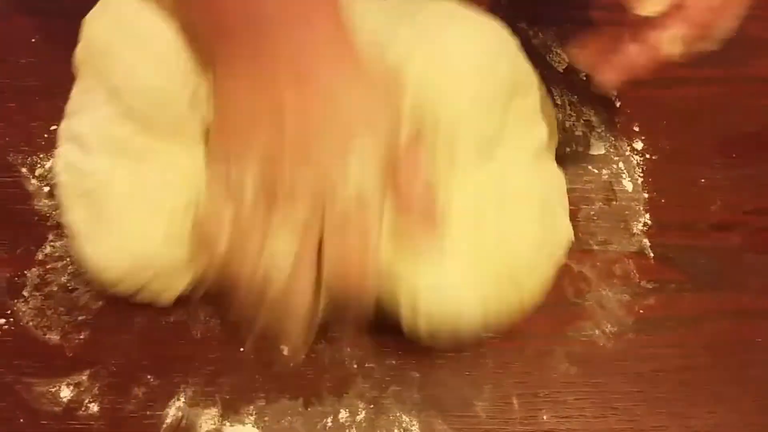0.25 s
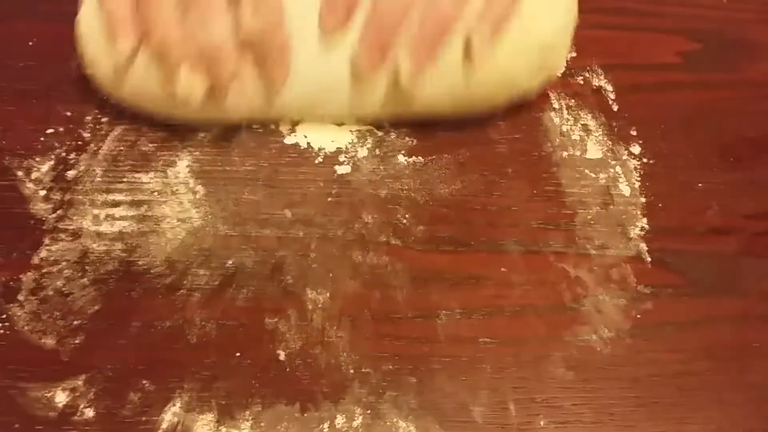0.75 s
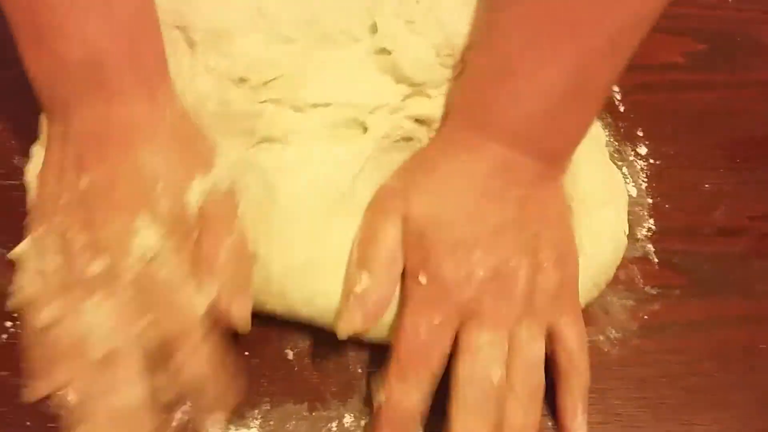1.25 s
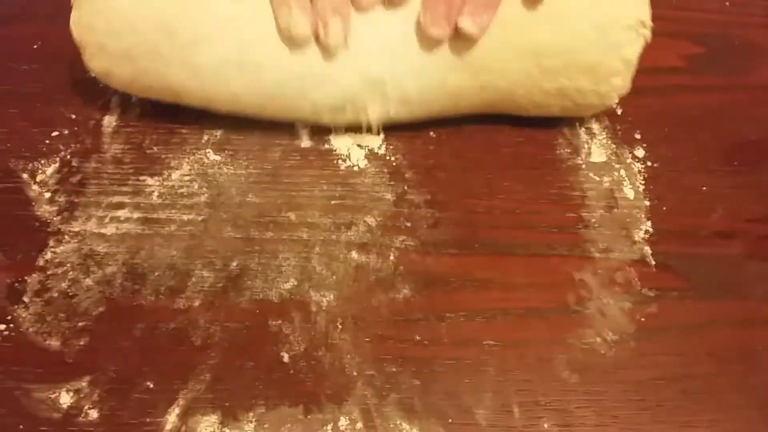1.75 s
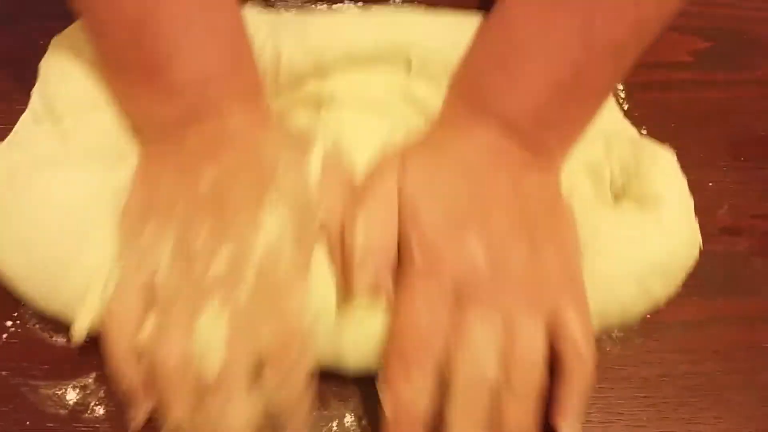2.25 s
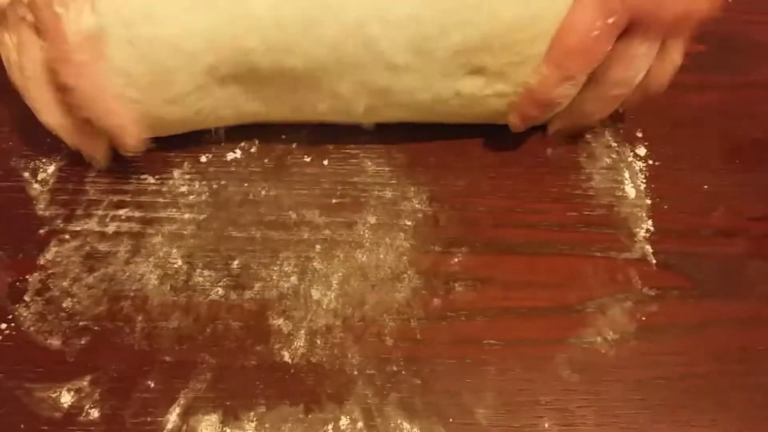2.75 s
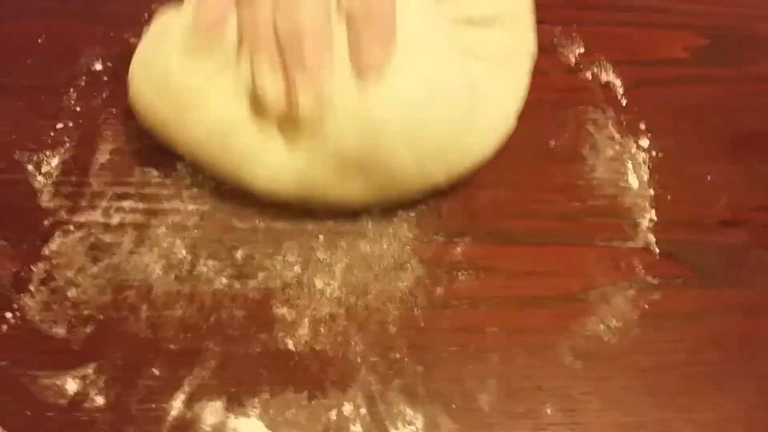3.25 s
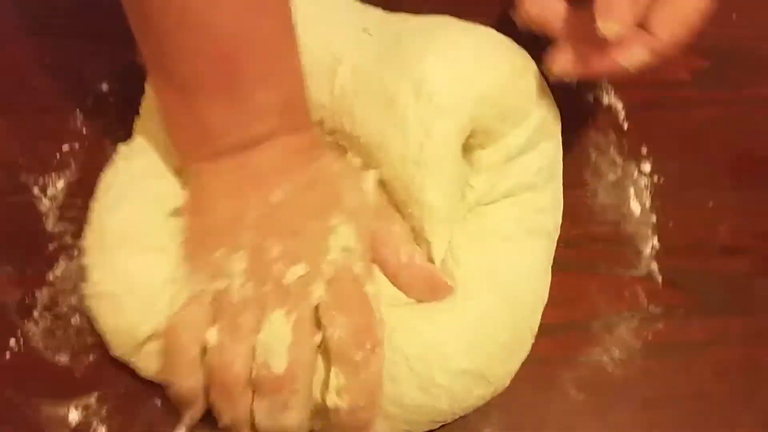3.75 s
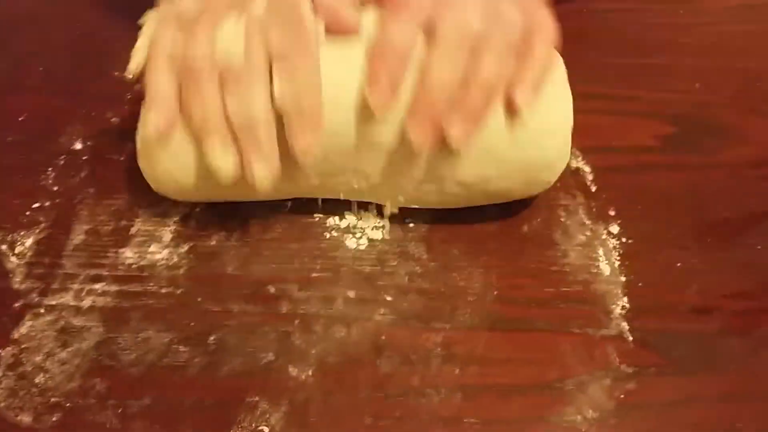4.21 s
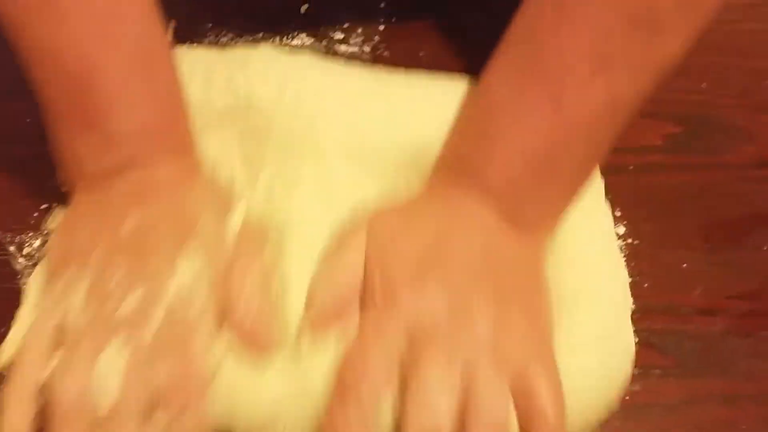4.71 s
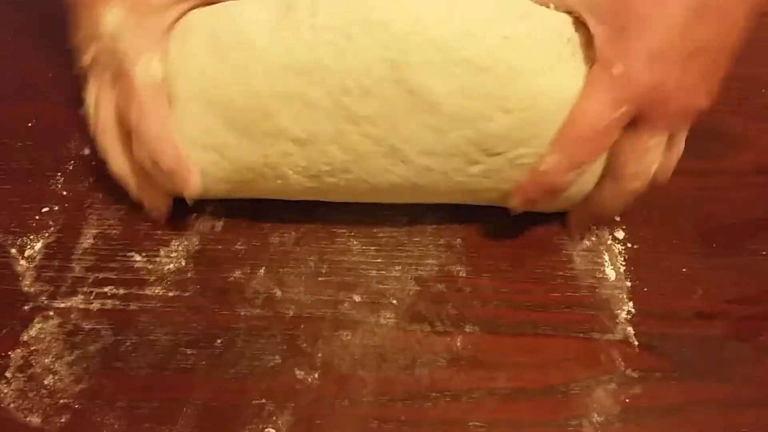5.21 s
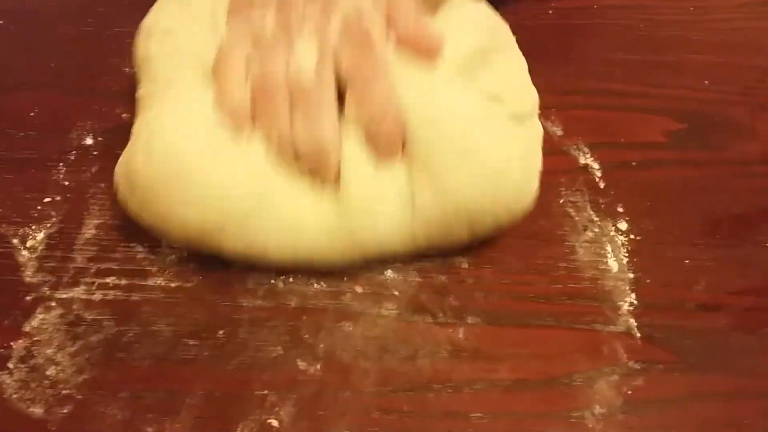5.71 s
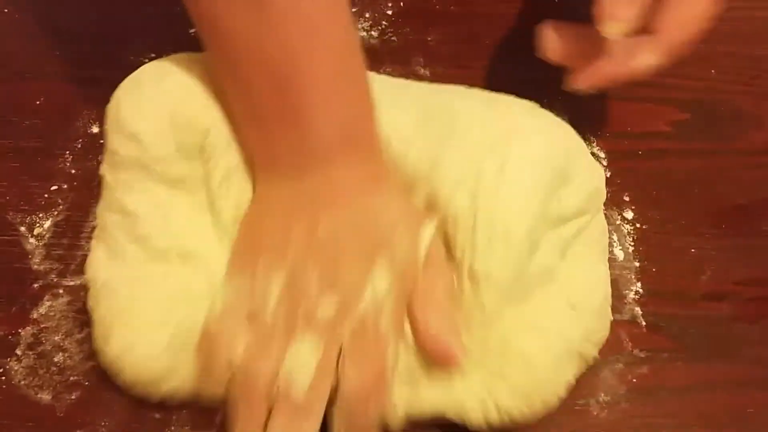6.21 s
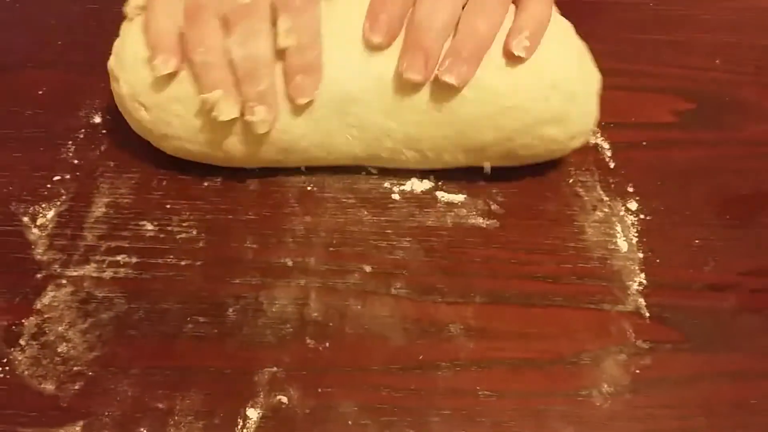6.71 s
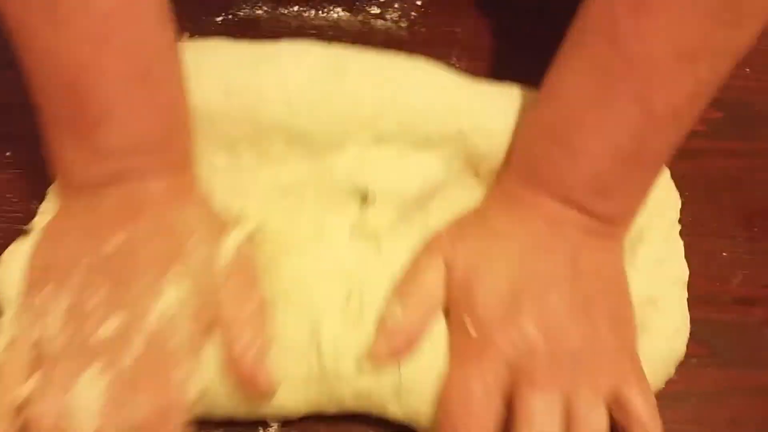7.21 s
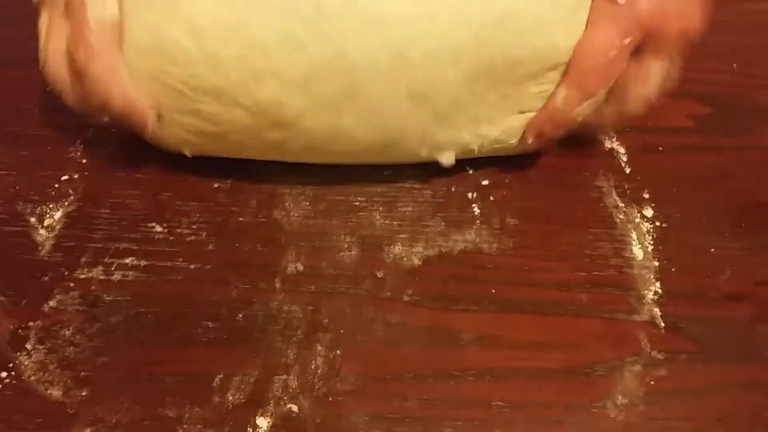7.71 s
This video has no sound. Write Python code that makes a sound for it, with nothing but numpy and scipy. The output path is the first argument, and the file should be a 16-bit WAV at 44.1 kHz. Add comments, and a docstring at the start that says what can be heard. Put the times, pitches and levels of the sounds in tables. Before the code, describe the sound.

Close by in a small, quiet kitchen, hands knead dough on a floured wooden table. It begins with soft pats and a rumbling push at 0.2 s, then a clearer smack at 0.67. Around 1.25 s a squelching shove ends in a short airy puff. Muted thuds and hollow pops follow, with a heavy thump at 2.65. Two hard slaps crack at 3.35 and 3.45, another at 4.28. A strong shove near 4.9 lets out air, a deep thud follows at 5.14, and bright slaps at 5.32 and 5.63, the latter loudest. Another push puffs at 6.22; slaps land at 6.72 and 6.81, with a barely audible high squeak around them. A last squelching press and puff come at 7.33, a low thump at 7.59 and a slap at 7.74. Faint flour rasp, tiny ticks, low room tone and hiss; the left side is louder, echoes short.

```python
"""Palms slap dough and the lump thumps a floured wooden table in a kitchen. Pushed, the dough squelches,
the wood rumbles and flour rasps; a few puffs, ticks and thin high squeaks come between, over room tone and hiss.
Blows are noise bursts ringing through cupped air and wood modes; rubbing is coloured grit under moving gains.
The left microphone port faces the table; the right hears it late, shadowed and scattered."""
import sys
import numpy as np
from scipy import signal
from scipy.fft import rfft, irfft, next_fast_len
from scipy.io import wavfile

SR = 44100
rng = np.random.default_rng(int(sys.argv[2]) if len(sys.argv) > 2 else 0)


def to_wav(s):
    """Save 16-bit WAV."""
    ch = np.atleast_2d(s).T  # columns
    pcm = np.round(np.clip(ch, -1, 1) * 32767)  # PCM
    wavfile.write(sys.argv[1], SR, pcm.astype(np.int16))


N = 351036   # samples
SIZE = next_fast_len(N + SR)   # transform length, with room for the tail
HZ = np.maximum(np.arange(SIZE // 2 + 1) * SR / SIZE, 1)

# palm on dough: (time [s], smack level [dB], pitch of the cupped air [Hz], hollow pop re smack [dB],
# crisp edge re smack [dB], length [s])
SLAPS = [(0.157, -50.5, 1310, -3, -39, 0.043), (0.209, -50, 1240, -13, -30, 0.035),
         (0.342, -61.5, 1500, -2, -12, 0.017), (0.6655, -38, 1270, 3, -36, 0.013),
         (1.199, -52.5, 1520, 1.5, -30, 0.046), (1.26, -48.5, 2090, -12, -24, 0.071),
         (1.483, -43, 2500, -14, -29, 0.0073), (1.708, -49, 1710, 0.5, -25, 0.012),
         (2.3256, -55, 1110, -0.5, -34, 0.17), (2.647, -46.5, 1920, 6.5, -28, 0.037),
         (2.697, -50, 1760, 6.5, -29, 0.065), (2.765, -39.5, 1030, 13, -27, 0.016),
         (3.2, -55, 1220, 2.5, -29, 0.068), (3.3476, -29, 1500, -3.5, -22, 0.017),
         (3.4523, -31.5, 1040, 4, -22.5, 0.013), (3.74, -54.5, 2200, -2, -27, 0.049),
         (3.757, -52.5, 2140, -21, -22, 0.041), (4.032, -59.5, 2700, 14, -23, 0.0088),
         (4.077, -58, 3000, -3, -23, 0.01), (4.121, -42, 1330, 6.5, -49, 0.017),
         (4.2825, -33, 1420, 1, -34, 0.015), (4.369, -43.5, 1260, 11.5, -23, 0.017),
         (4.532, -54.5, 1140, 3, -27, 0.018), (4.8217, -39, 1350, 13, -36, 0.01),
         (5.142, -47, 1860, 10.5, -23, 0.021), (5.168, -48, 2080, -6, -10.5, 0.03),
         (5.3239, -28, 1910, -3, -22.5, 0.019), (5.53, -53.5, 1880, 6, -21, 0.019),
         (5.6294, -24, 1710, -6, -20, 0.016), (5.755, -38.5, 2030, 0, -39, 0.034),
         (6.153, -63, 1220, 12.5, -37, 0.057), (6.206, -42, 2700, 4, -30, 0.013),
         (6.451, -60, 2250, 14.5, -19, 0.0088), (6.52, -55.5, 1050, 6, -18, 0.016),
         (6.7232, -30, 1420, -1.5, -24, 0.011), (6.81, -34, 1080, 8.5, -19.5, 0.01),
         (7.264, -49.5, 1680, 8.5, -27, 0.029), (7.3193, -44.5, 1690, -15, -26, 0.025),
         (7.591, -40.5, 2280, 10, -18.5, 0.0095), (7.7418, -28, 1440, -5.5, -21.5, 0.025)]
# dough or heel of the hand landing on the table: (time [s], shake level [dB], pitch [Hz], shake length [s])
THUMPS = [(0.157, -51.5, 260, 0.044), (0.192, -45.5, 98, 0.08), (0.462, -55, 286, 0.019),
          (0.663, -48, 150, 0.057), (0.79, -49, 124, 0.043), (0.9, -44.5, 116, 0.045),
          (0.972, -44, 103, 0.021), (1.232, -46, 120, 0.036), (1.358, -44.5, 106, 0.0083),
          (1.524, -52.5, 263, 0.016), (1.6, -58.5, 132, 0.05), (1.824, -46.5, 138, 0.052),
          (2.322, -45.5, 99, 0.22), (2.384, -43.5, 108, 0.06), (2.646, -34.5, 110, 0.028),
          (2.769, -42, 273, 0.017), (3.103, -44.5, 101, 0.021), (3.22, -49.5, 255, 0.052),
          (3.348, -46.5, 148, 0.094), (3.451, -41.5, 225, 0.066), (3.763, -42, 113, 0.049),
          (4.129, -46.5, 100, 0.047), (4.28, -50.5, 198, 0.12), (4.376, -41, 139, 0.023),
          (4.825, -39.5, 146, 0.046), (5.137, -32, 113, 0.064), (5.326, -50.5, 146, 0.028),
          (5.528, -34, 96, 0.045), (5.632, -41.5, 154, 0.062), (5.763, -48, 140, 0.064),
          (6.157, -52, 253, 0.05), (6.208, -38, 107, 0.068), (6.722, -45.5, 256, 0.072),
          (6.813, -43.5, 170, 0.16), (7.265, -47.5, 168, 0.088), (7.312, -46, 101, 0.081),
          (7.59, -29.5, 94, 0.009), (7.741, -44.5, 87, 0.056)]
# each shove or turn of the lump: (time of full force [s], hold [s], rumble [dB], squelch [dB],
# flour rasp [dB], finest dust [dB])
STROKES = [(0.0, 0.03, -55, -60.5, -77.5, -79), (0.206, 0.039, -51.5, -56, -69, -69),
           (0.3, 0.036, -55.5, -64.5, -69.5, -70), (0.998, 0.016, -69, -75, -84, -81),
           (1.259, 0.043, -48.5, -49.5, -70, -65), (1.29, 0.0084, -58, -52.5, -62.5, -59),
           (1.359, 0.057, -47, -55.5, -66.5, -60), (1.499, 0.024, -71, -77, -70, -63),
           (1.828, 0.03, -71, -64.5, -90, -78), (2.405, 0.009, -53.5, -52, -66, -66),
           (2.554, 0.015, -75, -65, -87, -73), (2.787, 0.04, -65, -67, -88, -81),
           (3.778, 0.042, -48, -53.5, -65.5, -69), (3.936, 0.0082, -61, -62.5, -69, -79),
           (4.902, 0.013, -44, -48.5, -61.5, -59), (5.196, 0.13, -61, -58.5, -73.5, -69),
           (5.335, 0.013, -44, -50.5, -58, -64), (5.552, 0.0053, -65, -59.5, -74, -85),
           (5.654, 0.016, -63, -58, -72, -72), (6.011, 0.01, -57, -65.5, -79.5, -74),
           (6.242, 0.0095, -45, -50, -67.5, -57), (6.307, 0.024, -51, -58.5, -71, -69),
           (6.948, 0.065, -46.5, -52.5, -76, -75), (7.044, 0.071, -48.5, -55.5, -78, -73),
           (7.132, 0.051, -68, -55, -73, -75), (7.327, 0.016, -40.5, -51.5, -78, -72),
           (7.357, 0.0079, -46, -46, -57, -55.5), (7.771, 0.02, -55, -66, -61.5, -72)]
# hands resting on and shifting the dough between strokes: (time [s], weight on the wood as rumble [dB],
# fingers on flour as rasp [dB])
HANDLING = [(0.0, -66, -94), (0.45, -87, -97), (0.63, -85, -108), (0.8, -60, -94), (1.1, -60, -85),
            (1.65, -64.5, -93), (2.3, -61.5, -88.5), (2.52, -61.5, -72), (2.97, -55.5, -74),
            (3.3, -62, -84), (4.0, -61, -84), (4.25, -66, -91), (4.5, -58, -84), (4.75, -54.5, -80.5),
            (5.1, -59.5, -82), (5.8, -58.5, -79), (6.12, -63.5, -100), (6.4, -60.5, -85), (6.7, -63, -93),
            (7.1, -59, -77.5), (7.5, -58.5, -82), (7.96, -60, -78.5)]
# trapped air bursting out at the end of a shove: (time [s], level [dB], pitch [Hz], length [s],
# flour [dB], dust [dB])
PUFFS = [(1.288, -34, 2560, 0.018, -48.5, -47), (4.877, -37.5, 2360, 0.014, -63, -51),
         (6.222, -38, 2530, 0.014, -55.5, -43), (7.345, -41.5, 2040, 0.023, -57, -51)]
# thin high squeaks, probably skin on the varnish: (time [s], pitch [Hz], level [dB])
SQUEAKS = [(6.459, 11700, -92), (6.51, 12400, -83), (6.55, 13300, -79), (6.6, 12900, -83),
           (6.65, 13300, -79), (6.69, 13100, -84), (6.72, 11800, -92), (6.73, 10500, -120),
           (6.84, 10500, -100), (6.88, 10700, -86), (6.94, 11900, -83), (6.99, 12300, -83),
           (7.02, 12000, -100)]
# small ticks close to the right port: (time [s], level before the port balance [dB])
TICKS = [(2.5127, -48), (3.941, -44), (5.0832, -52), (6.365, -47)]
# low modes of the table: (frequency [Hz], width [Hz], level [dB])
TABLE_LOW = [(99.4, 150, -6), (128.7, 29.4, 10), (244.4, 13.8, -3), (306, 15, -1.5)]
# high modes of the table: (frequency [Hz], width [Hz], level [dB])
TABLE_HIGH = [(685, 27, -19), (1280, 163, 6), (1890, 120, -15), (3830, 58, -22)]
# skin smacking dough, also the air of the puffs: (frequency [Hz], density [dB per Hz])
SMACK_SPECTRUM = [(470, -7.5), (800, -23.5), (969, -8.5), (1280, 1.5), (1740, -6.5), (1920, -2),
                  (2300, -4.5), (5000, -29), (6500, -60), (11000, -120)]
# hollow pop of trapped air: (frequency [Hz], density [dB per Hz])
HOLLOW_SPECTRUM = [(250, -22.5), (380, 1.5), (550, -0.5), (760, 3), (950, -10.5), (1300, -24), (2200, -100)]
# blows and rumble in the wood: (frequency [Hz], density [dB per Hz])
THUD_SPECTRUM = [(12, -60), (20, -10), (111, -1.5), (172, -5), (251, -1), (312, -3.5), (715, -15.5),
                 (872, -45.5), (1500, -40.5), (1950, -52), (3300, -120)]
# wet dough, also the ticks: (frequency [Hz], density [dB per Hz])
SQUELCH_SPECTRUM = [(180, -31.5), (300, -7), (645, -1), (1040, -7), (1900, -6), (2070, -9), (2190, -5),
                    (3860, -18), (5000, -32.5), (6500, -70), (11000, -120)]
# dry flour, also the crisp edge of a slap: (frequency [Hz], density [dB per Hz])
RASP_SPECTRUM = [(2350, -32), (3800, 8.5), (4130, -0.5), (4960, -4), (7110, -1), (9890, -7.5),
                 (12000, -9.5), (15600, -48), (22000, -120)]
# finest flour dust: (frequency [Hz], density [dB per Hz])
DUST_SPECTRUM = [(8000, -27), (11500, -11.5), (14000, -7), (15200, -3.5), (15900, -1.5)]
# decay of the kitchen's echoes: (frequency [Hz], time to fall 60 dB [s])
KITCHEN_T60 = [(100, 0.19), (400, 0.26), (1500, 0.35), (5000, 0.11), (14000, 0.16)]
# shadow over the right port: (frequency [Hz], loss re left port [dB])
SHADOW = [(60, 1), (110, 7), (200, 8.5), (380, 9), (700, 12), (1290, 12.5), (2380, 13.5), (4400, 7),
          (8120, 17), (15000, 6)]
# likeness of the room at both ports: (frequency [Hz], likeness [0 to 1, clipped])
ALIKE = [(60, 0.86), (250, 1), (700, 0.2), (2000, 0.15), (8000, 0.16)]
# steady air of the kitchen: (frequency [Hz], density [dB per Hz])
ROOM_TONE_SPECTRUM = [(12, -41), (20, -8), (44, -1), (110, -2.5), (186, -5), (240, 7), (308, -2.5),
                      (637, -7), (967, -12), (2360, -17.5), (3300, -24.5), (3800, -24), (5930, -43.5),
                      (15800, -49)]

# cupped pitch: level at a 0 dB smack and 1500 Hz; harder smacks flatten the palm (dB per dB);
# smaller pockets of air ring more clearly (dB per octave)
CUPPED_DB, CUPPED_LOSS, CUPPED_PER_OCTAVE_DB = -5.5, 0.17, 4.5
HOLLOW_LONGER, CRISP_SHORTER = 1.8, 0.44   # lengths as multiples of the smack's
KNOCK_DB = 27.5   # first knock of a landing over its shake
CONTACT_HZ = 320.0   # lowpass: soft dough spreads the blow over a moment
LEAN_IN_DB_PER_S, HOLD_SAG_DB_PER_S, LET_GO_DB_PER_S = 295, 53, 191
DUST_CLEARS = 1.16   # dust comes and goes this much faster
# slapped dough settles: squelch re smack, flour re crisp edge, fade
SETTLE_DB, SETTLE_FLOUR_DB, SETTLE_DB_PER_S = -19.5, -14.5, 113
# handling: squelch re rumble; dust = offset + share of the rasp level
HANDLING_SQUELCH_DB, HANDLING_DUST_DB, HANDLING_DUST_FOLLOWS = -9.0, -37.5, 0.46
PUFF_RISE_S, PUFF_FADE_DB_PER_S, PUFF_OVERTONE = 0.0057, 1500.0, 1.22   # overtone as a pitch ratio
PORT_LAG = 17   # samples by which the right port is late
ROOM_TONE_DB = -64.5   # rms over both ports, before their balance
CUTOFF_HZ = 16150


def slaps(rows):
    """Trapped air gives a hollow pop, skin a smack that rings the table's high modes, and a brief crisp edge."""
    s, smack_db, hz, hollow_db, crisp_db, length = np.transpose(rows)
    cupped_db = CUPPED_DB - CUPPED_LOSS * smack_db + CUPPED_PER_OCTAVE_DB * np.log2(hz / 1500)
    smack = bursts(s, smack_db, length, 0.00038, 16.0, hz, sharp=4.6, pitch_db=cupped_db)
    hollow = bursts(s, smack_db + hollow_db, HOLLOW_LONGER * length, 0.0015, 8.9)
    crisp = bursts(s, smack_db + crisp_db, CRISP_SHORTER * length, 0.00014, 19.0)
    on_wood = colour(smack, SMACK_SPECTRUM) + colour(hollow, HOLLOW_SPECTRUM)
    return body(on_wood, TABLE_HIGH, ring_db=-0.5) + colour(crisp, RASP_SPECTRUM)


def thumps():
    """A soft heavy blow shakes the low modes of the table, most of all near the lump's own pitch."""
    s, shake_db, hz, length = np.transpose(THUMPS)
    blows = bursts(s, shake_db, length, 0.0013, KNOCK_DB, hz, sharp=2.6, pitch_db=7.5)
    soft = np.exp(-2 * np.pi * CONTACT_HZ / SR)
    blows = signal.lfilter([1 - soft], [1, -soft], blows)
    return body(colour(blows, THUD_SPECTRUM), TABLE_LOW, ring_db=-2.0)


def pushing(gains):
    """Rumble through the wood, wet squelch and dry flour, jerking with stick and slip."""
    slip_db = 3.5 * drift(40.0)   # shared by squelch and rasp
    kneading = colour(grit(200, 3.0), THUD_SPECTRUM)
    rumble = amp(3.73 * drift(43.0)) * rms_one(body(kneading, TABLE_LOW, ring_db=7.0))
    squelch = amp(slip_db) * colour(grit(2000, 3.0), SQUELCH_SPECTRUM)
    rasp = amp(0.53 * slip_db) * colour(grit(8200, 0.76), RASP_SPECTRUM)
    dust = amp(3.5 * drift(30.0)) * colour(grit(9000, 4.2), DUST_SPECTRUM)
    return np.sum(gains * [rumble, squelch, rasp, dust], axis=0)


def efforts():
    """Gains of rumble, squelch, rasp and dust: powers of strokes, settling after slaps and handling add."""
    s, hold, rumble_db, squelch_db, rasp_db, dust_db = np.transpose(STROKES)
    hit, smack_db, _, _, crisp_db, length = np.transpose(SLAPS)
    at, weight_db, finger_db = np.transpose(HANDLING)
    t = np.arange(N) / SR
    weight_db = np.interp(t, at, weight_db)
    finger_db = np.interp(t, at, finger_db)

    def stroke(db, speed=1):
        return swells(s, hold, db, speed * LEAN_IN_DB_PER_S, speed * LET_GO_DB_PER_S)

    def settle(db):
        return swells(hit + length, 0 * hit, db, 2000, SETTLE_DB_PER_S)

    # doubling the dB turns gain into power
    rumble = stroke(rumble_db) + amp(2 * weight_db)
    squelch = stroke(squelch_db) + settle(smack_db + SETTLE_DB)
    squelch += amp(2 * (weight_db + HANDLING_SQUELCH_DB))
    rasp = stroke(rasp_db) + settle(smack_db + crisp_db + SETTLE_FLOUR_DB) + amp(2 * finger_db)
    dust = stroke(dust_db, DUST_CLEARS)
    dust += amp(2 * (HANDLING_DUST_DB + HANDLING_DUST_FOLLOWS * finger_db))
    return np.sqrt([rumble, squelch, rasp, dust])


def swells(times, holds, levels_db, rise_db_per_s, fall_db_per_s):
    """Summed power of gestures that lean in, sag while held and let go."""
    late = np.arange(0, N + 64, 64) / SR - np.c_[times]   # one row per gesture, every 64 samples
    hold = np.maximum(np.c_[holds], 0)
    lean_in = rise_db_per_s * np.minimum(late, 0)
    sag = HOLD_SAG_DB_PER_S * np.clip(late, 0, hold)
    let_go = fall_db_per_s * np.maximum(late - hold, 0)
    power = np.sum(amp(2 * (np.c_[levels_db] + lean_in - sag - let_go)), axis=0)
    return np.interp(np.arange(N) / 64, np.arange(late.shape[1]), power)


def puffs():
    """Trapped air bursts out: a short held hiss through a tearing slit with two loose pitches, blowing flour."""
    out, t = np.zeros(N), np.arange(N) / SR
    air, flour, dust = (colour(grit(6000, 2.0), shape)
                        for shape in (SMACK_SPECTRUM, RASP_SPECTRUM, DUST_SPECTRUM))
    for s, level_db, hz, length, flour_db, dust_db in PUFFS:
        fade = amp(-PUFF_FADE_DB_PER_S * np.maximum(t - s - length, 0))
        gate = np.clip((t - s) / PUFF_RISE_S, 0, 1) * fade
        slit = air + amp(6.0) * resonance(air, hz, hz / 6.6)
        slit = slit - amp(12.5) * resonance(air, PUFF_OVERTONE * hz, hz / 4.0)
        out += gate * (amp(level_db) * slit + amp(flour_db) * flour + amp(dust_db) * dust)
    return out


def squeak():
    """A narrow tone, wavering in pitch and fluttering in level."""
    s, hz, level_db = np.transpose(SQUEAKS)
    t = np.arange(N) / SR
    pitch = np.interp(t, s, hz) + 200 * drift(90.0)
    flutter_db = np.interp(t, s, level_db, -200, -200) + 3.3 * drift(60.0)
    return amp(flutter_db) * np.sin(2 * np.pi * np.cumsum(pitch) / SR)


def ticks():
    """Short dry noise clicks, unshadowed and stronger at the right port."""
    s, level_db = np.transpose(TICKS)
    tick = colour(bursts(s, level_db, 0.0011, 0.0003, 3.6), SQUELCH_SPECTRUM)
    return tick * amp([[-3.0], [3.0]])


def kitchen(x, wet_db):
    """Direct sound plus a noise tail, each octave with its own decay; the right port is late and scattered."""
    t, tails = np.arange(SR) / SR, 0
    for low in 30 * 2. ** np.arange(9):
        octave = signal.butter(2, [low, 2 * low], "band", fs=SR, output="sos")
        band = signal.sosfilt(octave, rng.standard_normal((2, SR)))
        decay = amp(-60 * t / at_hz(KITCHEN_T60, low * np.sqrt(2)))
        tails = tails + band * decay * (1 - np.exp(-t / 0.0067))
    left, right = ports(*rfft(amp(wet_db) * tails, SIZE))
    scatter = rng.standard_normal(SR) * amp(-60 * t / 0.0029)
    scatter /= np.sqrt(np.sum(scatter ** 2))
    straight, bent = ports(0.92, rfft(scatter, SIZE))
    response = np.array([straight + left, (bent + right) * shadow()])
    return irfft(rfft(x, SIZE) * response, SIZE)[:, :N]


def shadow():
    """Loss over frequency and delay at the right port."""
    return amp(-at_hz(SHADOW, HZ)) * np.exp(-2j * np.pi * HZ * PORT_LAG / SR)


def ports(left, other):
    """Two unrelated spectra become left and right, alike in the bass and mostly unlike in the treble."""
    alike = np.clip(at_hz(ALIKE, HZ), 0, 1)
    return left, alike * left + np.sqrt(1 - alike ** 2) * other


def room_tone():
    """Steady air of the kitchen and hiss as coloured noise, louder on the left."""
    noise = rfft(rng.standard_normal((2, SIZE))) * amp(at_hz(ROOM_TONE_SPECTRUM, HZ))
    left, right = ports(*noise)
    air = rms_one(irfft([left, right], SIZE)[:, :N])
    return amp(ROOM_TONE_DB) * air * amp([[3.5], [-3.5]])


def bursts(times, levels_db, lengths, rises, cracks_db, pitches=None, sharp=3.0, pitch_db=8.0):
    """Contacts: a first crack, then noise that swells and loses 20 dB over its length; may favour a pitch."""
    out, t = np.zeros(N + SR), np.arange(SR // 3) / SR
    rows = np.broadcast(times, levels_db, lengths, rises, cracks_db, pitch_db)
    for k, (s, level_db, length, rise, crack_db, favour_db) in enumerate(rows):
        envelope = amp(-20 * t / max(length, .002)) * (1 - np.exp(-t / max(rise, .0001)))
        burst = envelope * rng.standard_normal(len(t))
        burst[0] = amp(crack_db)
        if pitches is not None:
            burst += amp(favour_db) * resonance(burst, pitches[k], pitches[k] / sharp)
        start = round(s * SR)
        out[start:start + len(t)] += amp(level_db) * burst
    return out[:N]


def grit(per_s, spread_db):
    """Dense uneven grains, as of many small contacts; rms 1."""
    sizes = amp(spread_db * np.minimum(rng.exponential(1, N), 5)) * rng.choice([-1, 1], N)
    return rms_one(sizes * (rng.random(N) < per_s / SR))


def body(x, modes, ring_db):
    """The sound plus what the wood's resonances make of it, in alternating sign."""
    ring = 0
    for k, (hz, width_hz, db) in enumerate(modes):
        ring = ring + (-1) ** k * amp(db + ring_db) * resonance(x, hz, width_hz)
    return x + ring


def resonance(x, hz, width_hz):
    """Two-pole band with about unit gain at its top."""
    r = np.exp(-np.pi * width_hz / SR)
    poles = [1, -2 * r * np.cos(2 * np.pi * hz / SR), r * r]
    return (1 - r * r) / 2 * signal.lfilter([1, 0, -1], poles, x + 1e-18)


def colour(x, spectrum):
    """Causal (minimum-phase) filter with the given dB shape and unit power gain."""
    hz = np.maximum(np.arange(4097) * SR / 8192, 1)
    cepstrum = irfft(at_hz(spectrum, hz) * np.log(10) / 20)
    cepstrum[1:4096] *= 2   # folding the cepstrum makes the phase minimum
    cepstrum[4097:] = 0
    pulse = irfft(np.exp(rfft(cepstrum)))
    return signal.fftconvolve(x, pulse / np.sqrt(np.sum(pulse ** 2)))[:N]


def drift(rate):
    """Slow chance wander with rms 1: noise through two equal lowpass poles at a rate in Hz."""
    r = np.exp(-2 * np.pi * rate / SR)
    wander = signal.lfilter([1], [1, -2 * r, r * r], rng.standard_normal(N + SR))
    return rms_one(wander[SR:])


def at_hz(points, hz):
    """Read a table on a log-frequency axis."""
    table_hz, values = np.transpose(points)
    return np.interp(np.log(hz), np.log(table_hz), values)


def rms_one(x):
    """Scale to unit rms."""
    return x / np.sqrt(np.mean(x ** 2) + 1e-20)


def amp(db):
    """dB to gain."""
    return 10 ** (np.asarray(db) / 20)


def scene():
    """Slaps on three spots in turn, the lump and two layers of rubbing, each with its own echoes."""
    hands = sum(kitchen(slaps(SLAPS[spot::3]), wet_db=-29.5) for spot in range(3))
    lump = kitchen(thumps(), wet_db=-25.5)
    gains = efforts()
    rubbing = kitchen(pushing(gains) + squeak() + puffs(), wet_db=-35.0)
    rubbing = rubbing + kitchen(pushing(gains), wet_db=-30.0)   # each hand rubs on its own
    return hands + lump + rubbing + ticks() + room_tone()


def record(dry):
    """Each microphone channel adds its own faint hiss; the top is cut steeply."""
    hiss = amp(-87.0) * rng.standard_normal(dry.shape)
    return signal.sosfilt(signal.cheby2(20, 70, CUTOFF_HZ, fs=SR, output="sos"), dry + hiss)


dry = scene()
out = record(dry)
to_wav(out)
```